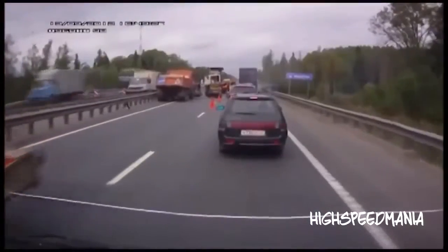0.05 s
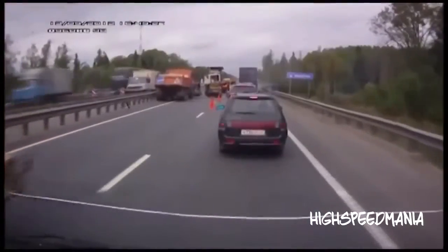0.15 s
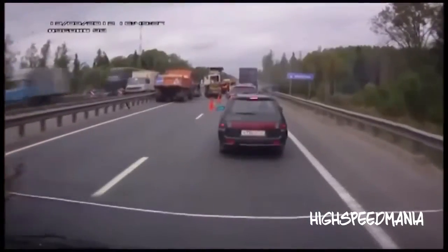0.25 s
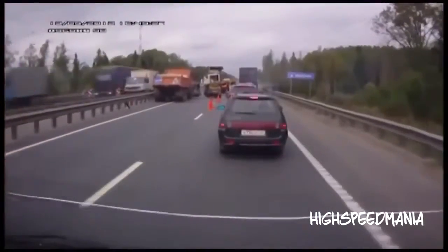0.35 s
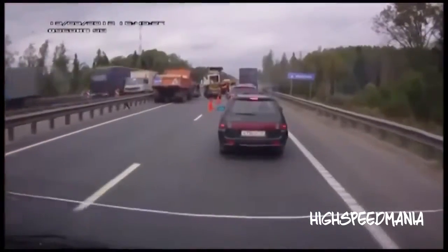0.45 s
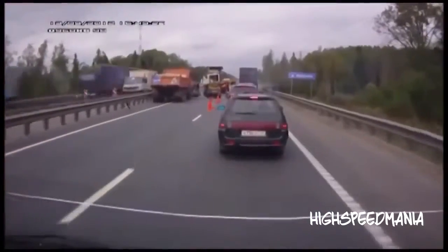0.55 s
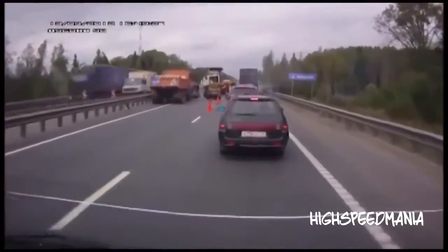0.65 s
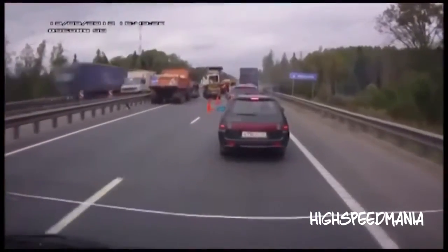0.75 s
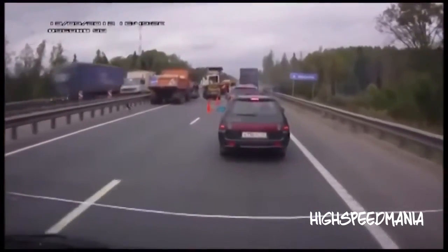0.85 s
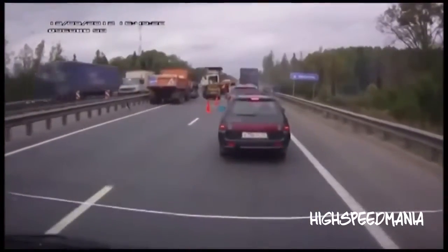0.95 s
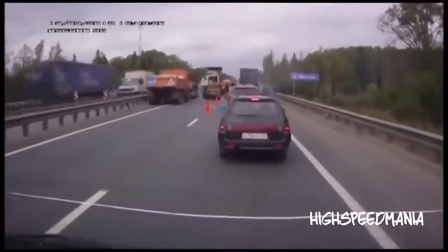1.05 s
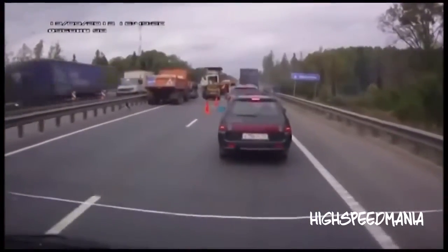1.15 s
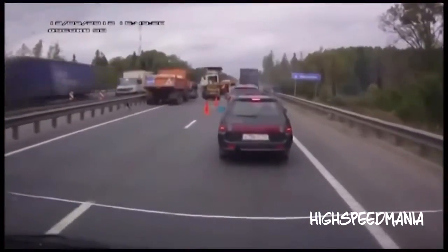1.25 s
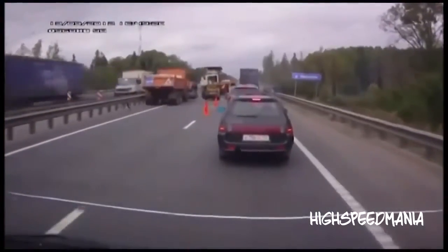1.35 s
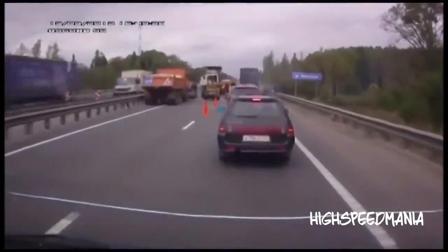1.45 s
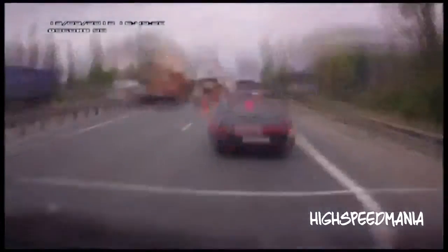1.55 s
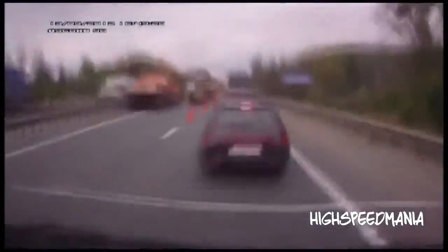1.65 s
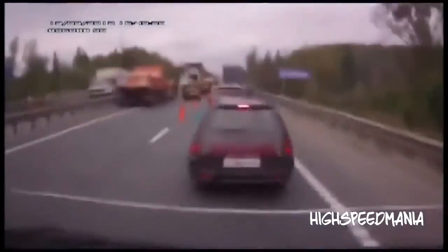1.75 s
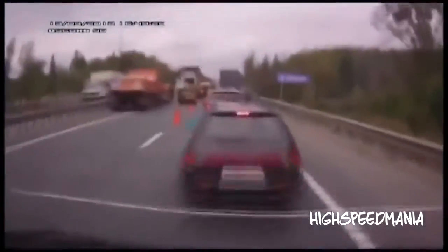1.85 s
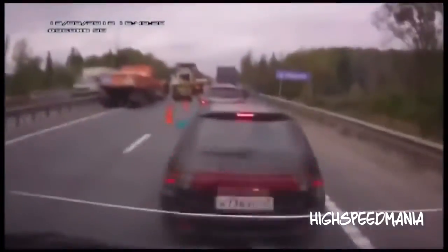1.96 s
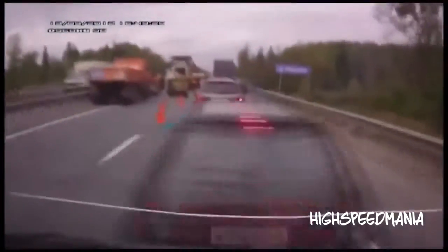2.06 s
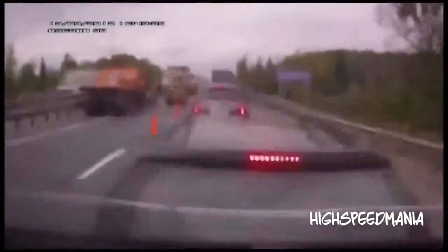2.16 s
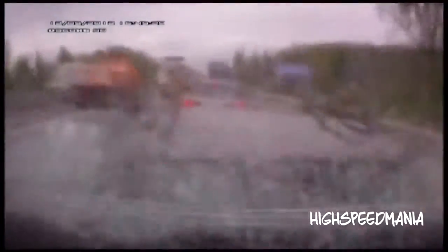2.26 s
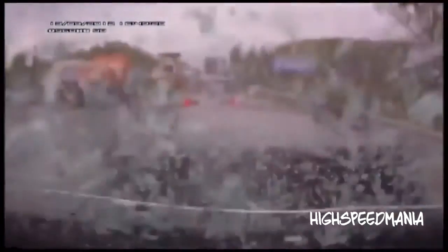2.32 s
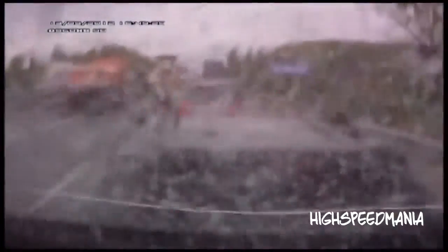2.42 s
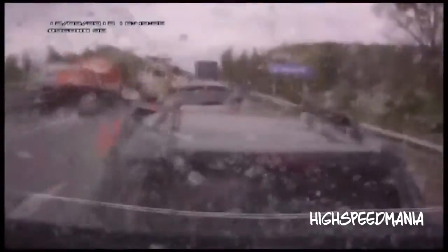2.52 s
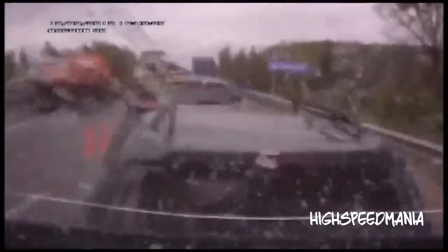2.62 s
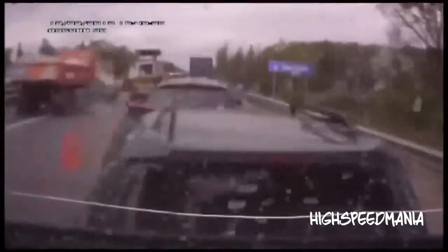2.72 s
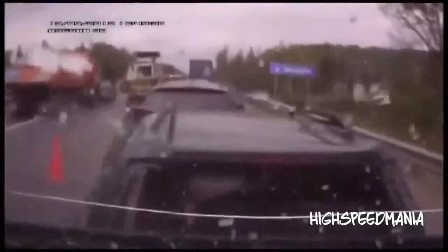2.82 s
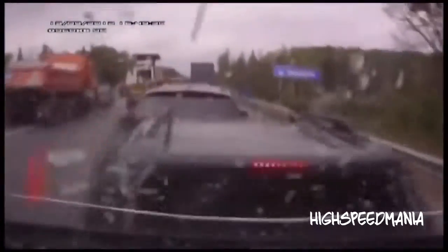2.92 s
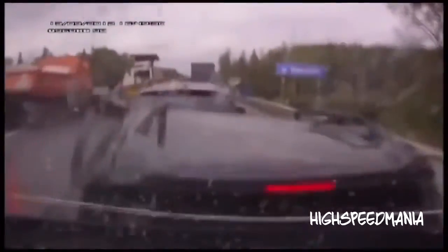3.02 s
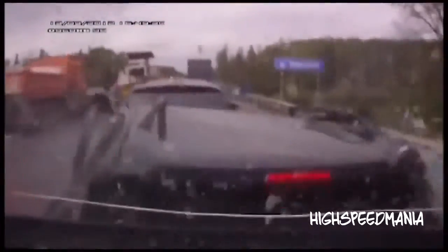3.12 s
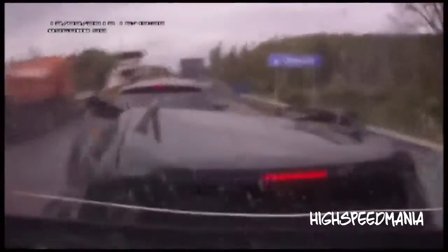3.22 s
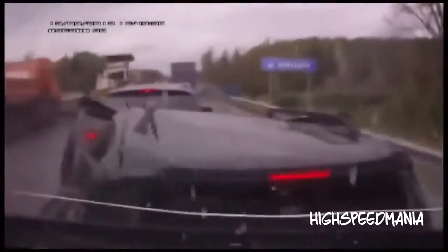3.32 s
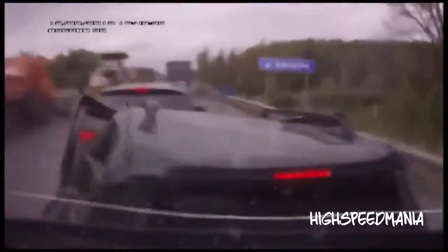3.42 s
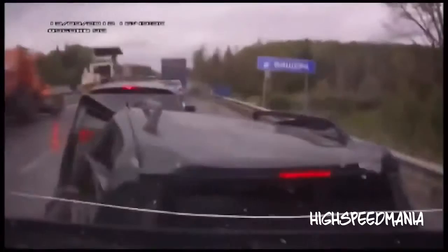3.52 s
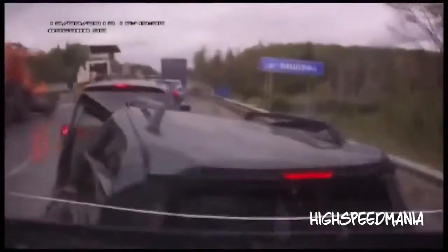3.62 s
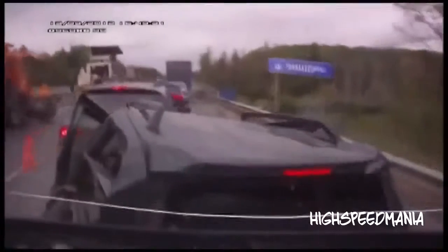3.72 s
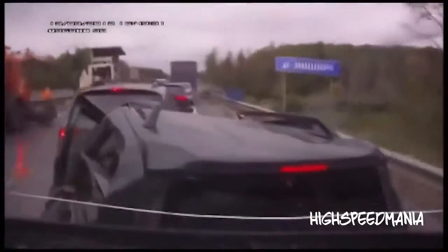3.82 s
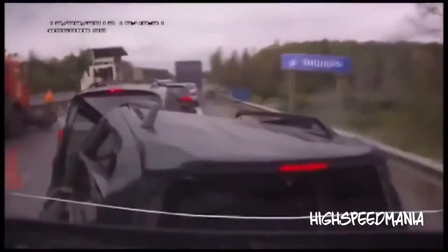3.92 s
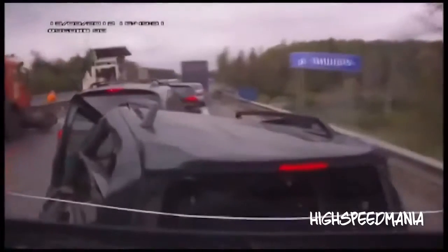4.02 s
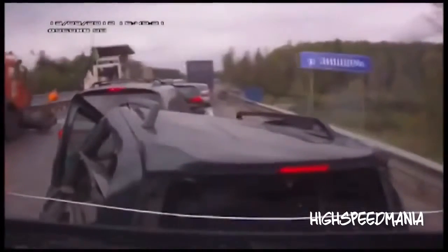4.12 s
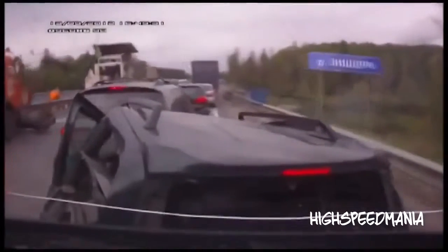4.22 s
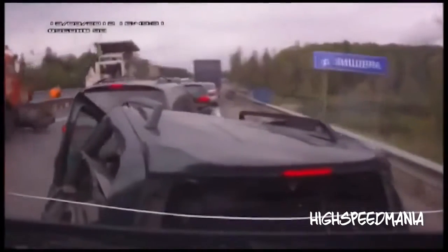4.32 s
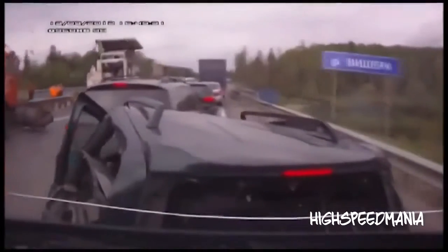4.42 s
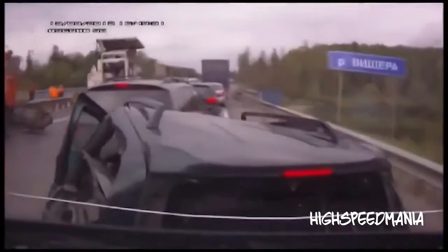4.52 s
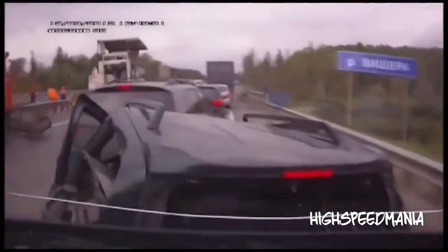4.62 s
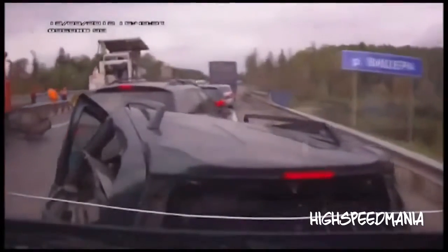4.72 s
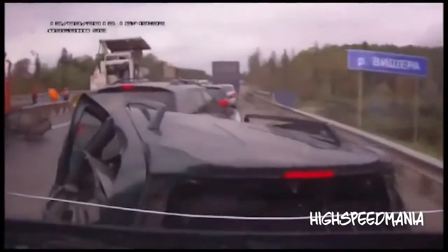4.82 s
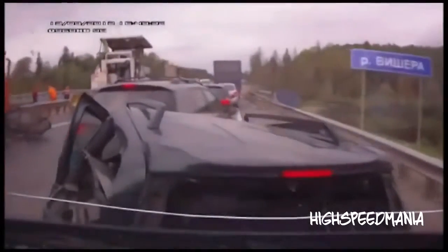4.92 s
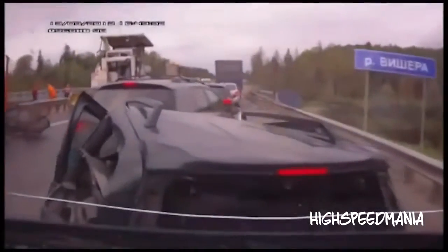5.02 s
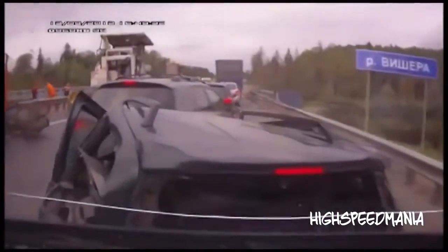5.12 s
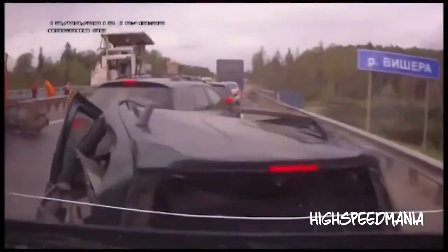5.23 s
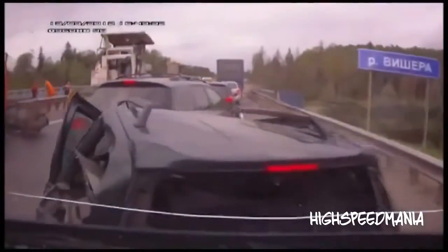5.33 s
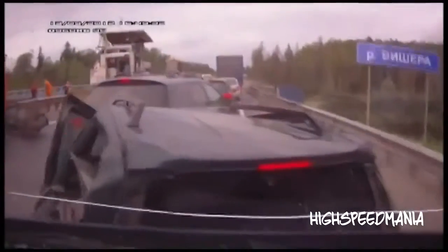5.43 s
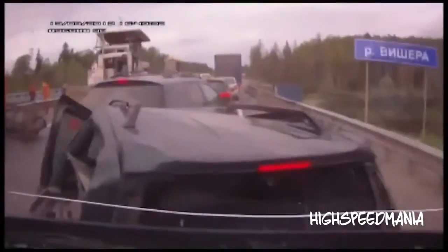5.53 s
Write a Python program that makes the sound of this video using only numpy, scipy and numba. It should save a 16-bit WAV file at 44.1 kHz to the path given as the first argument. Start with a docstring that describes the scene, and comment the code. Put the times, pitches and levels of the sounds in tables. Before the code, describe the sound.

Inside a car on a highway, the engine and tyres hum low. A dull jolt hits from behind, and half a second later the car crashes loudly into the one ahead. Panels boom, sheet metal crumples and scrapes, and glass showers down through repeated blows. The impacts thin into clatter while the labouring engine shakes the body. The small dashboard microphone overloads, so the crash sounds squashed and distorted.

```python
"""A steady hum of engine and tyres fills a car on a highway; then come a jolt from behind and a crash
into the car ahead. Impacts excite the modes of the panels, sheet metal crumples and scrapes by
stick-slip friction, and glass showers down and rings. The labouring engine shakes the body on its
mounts while loose parts clatter. The small dashboard microphone overloads, so its limiter pumps
and the peaks are flattened."""
import sys
import numpy as np
from scipy import signal
from scipy.fft import rfft, irfft, next_fast_len
from scipy.io import wavfile
from scipy.ndimage import uniform_filter1d
from numba import njit

SR = 44100
rng = np.random.default_rng(int(sys.argv[2]) if len(sys.argv) > 2 else 0)


def dump(signal):
    """Clip the signal to [-1, 1] and save it as 16-bit WAV at the path in sys.argv[1]."""
    limited = np.clip(np.atleast_2d(signal).T, -1, 1)
    pcm = np.round(limited * 32767).astype(np.int16)
    wavfile.write(sys.argv[1], SR, pcm)


N = 245725

# bouts of the body shaking on its mounts: (start [s], end [s], first rate [Hz], last rate [Hz], level [dB])
SHUDDER_BOUTS = [(2.039, 2.212, 30, 26, -28.5), (2.298, 2.542, 22, 22.06, -20),
                 (2.574, 2.772, 18.2, 21.1, -22), (2.966, 3.104, 37, 40, -22),
                 (3.095, 3.305, 32.5, 23.5, -18), (3.297, 3.535, 22, 31, -23),
                 (3.637, 3.831, 33, 31, -11.5), (3.854, 4.031, 35.5, 26, -20),
                 (4.09, 4.916, 22.8, 18.2, -12), (4.979, 5.228, 30.5, 30.5, -17),
                 (5.248, 5.549, 23.6, 26, -13.5)]


def amp(db):
    return 10 ** (np.asarray(db) / 20)


def unit_rms(x):
    return x / np.sqrt(np.mean(x ** 2) + 1e-20)


def curves(rows):
    """Linear interpolation turns each column after the time into a curve over all samples."""
    times, *columns = np.transpose(rows)
    return [np.interp(np.arange(N) / SR, times, column) for column in columns]


def span(start, end):
    """A trapezoidal window with 25 ms ramps."""
    t = np.arange(N) / SR
    return np.clip(np.minimum(t - start, end - t) / .025, 0, 1)


def coloured(x, spectrum):
    """Zero-phase filtering by a gain curve of (frequency [Hz], gain [dB]) points."""
    points_hz, db = np.transpose(spectrum)
    size = next_fast_len(N)
    hz = np.fft.rfftfreq(size, 1 / SR)
    gain = amp(np.interp(np.log(hz + 1), np.log(points_hz + 1), db, left=-120, right=-120))
    return irfft(rfft(x, size) * gain, size)[..., :N]


def resonate(x, modes):
    """Modal superposition: two-pole resonators, each of unit power on white noise before its gain."""
    out = np.zeros(x.shape)
    for hz, width_hz, db in modes:
        radius, angle = np.exp(-np.pi * width_hz / SR), 2 * np.pi * hz / SR
        mode = signal.lfilter([np.sin(angle)], [1, -2 * radius * np.cos(angle), radius ** 2], x)
        out += amp(db) * np.sqrt(2 * (1 - radius ** 2)) * mode
    return out


def grains(per_s, spread_db, bed):
    """Shot noise: random clicks of uneven size over a bed of white noise."""
    sizes = amp(spread_db * np.minimum(rng.exponential(1, N), 5)) * rng.standard_normal(N)
    clicks = unit_rms(sizes * (rng.random(N) < per_s / SR))
    return unit_rms(clicks + bed * rng.standard_normal(N))


def flutter(seconds, depth_db):
    """Random amplitude modulation: smoothed noise makes the level flicker."""
    width = int(seconds * SR)
    drift = uniform_filter1d(uniform_filter1d(rng.standard_normal(N), width), width)
    return unit_rms(amp(depth_db * unit_rms(drift)))


def throb(rows, second_db):
    """A gliding fundamental and its second harmonic, from (time [s], rate [Hz], level [dB]) rows."""
    hz, db = curves(rows)
    start, first_hz, _ = rows[0]
    phase = 2 * np.pi * (np.cumsum(hz) / SR - start * first_hz)
    return np.sqrt(2) * amp(db) * (np.sin(phase) + amp(second_db) * np.sin(2 * phase))


def engine():
    """Periodic firing makes a hum, whose pitch drops as the driver lifts off."""
    # the cruising engine: (time [s], firing rate [Hz], level [dB])
    firing = [(0.0, 33.7, -30.5), (0.11, 33.54, -36), (0.56, 34.81, -37), (0.68, 33.56, -30.5),
              (0.81, 33.56, -38.5), (1.19, 36.78, -36), (1.316, 33.54, -33.5), (1.45, 27.8, -35.5),
              (1.75, 29.6, -33.5)]
    fade_out = np.clip((firing[-1][0] - np.arange(N) / SR) / 0.038, 0, 1)
    return throb(firing, second_db=-14.5) * fade_out


def tyres():
    """Broadband excitation by the road makes the tyres roar and the cabin resonate."""
    # tyre roar: (frequency [Hz], relative spectral density [dB])
    roar_spectrum = [(24, -31.5), (40, -25.5), (58, -10.5), (123, -13.5), (187, -9.5), (336, -23.5),
                     (495, -28), (984, -31.5), (1380, -37.5), (1710, -67), (2200, -103), (2860, -116),
                     (4840, -120)]
    # cabin resonances: (frequency [Hz], bandwidth [Hz], gain [dB])
    cabin_modes = [(81.3, 1.1, -48.5), (181.2, 8.4, -50), (470, 4, -65.5), (18.6, 8.5, -41.5)]
    # swell of the road noise: (time [s], gain [dB])
    swell = [(0, -3.5), (.8, 0), (1.6, 1), (1.75, 7.5), (2.2, 1.5), (4.2, 7.5), (5.57, 8)]
    roar = amp(-46.5) * unit_rms(coloured(rng.standard_normal(N), roar_spectrum)) * flutter(0.0092, 1.8)
    booms = resonate(rng.standard_normal(N), cabin_modes)
    return amp(curves(swell)[0]) * (roar + booms)


def wreck():
    """Incoherent sources add in power: the aftermath of each blow swells panels, metal and glass."""
    # slow course of the wreck: (time [s], heave [dB], panel boom [dB], metal [dB], glass [dB])
    course = [(1.69, -35.5, -39, -61, -76), (1.73, -23, -32, -43.5, -58.5), (1.765, -26.5, -36, -65, -67),
              (1.8, -26, -30.5, -40, -58), (1.835, -33.5, -30.5, -52.5, -65), (1.9, -34, -38, -57.5, -72),
              (1.93, -26, -43.5, -52.5, -100), (2.03, -37.5, -58, -59, -100),
              (2.19, -23.5, -44.5, -51, -83.5), (2.2, -23.5, -19, -35, -45), (2.22, -24.5, -34, -39, -44),
              (2.29, -32.5, -26, -34, -44.5), (2.35, -25, -20.5, -20.5, -39.5), (2.4, -18, -22, -27.5, -48),
              (2.5, -33.5, -13, -18.5, -35.5), (2.6, -35, -36, -25, -43.5), (2.7, -5.5, -14.5, -21, -36),
              (2.765, -32, -21.5, -36, -60), (2.8, -40, -23, -25, -39), (2.83, -43, -27, -15, -24),
              (2.865, -44.5, -29.5, -22.5, -32.5), (2.94, -43.5, -26, -15, -28.5),
              (3.0, -24, -26.5, -33, -36.5), (3.35, -18.5, -21.5, -19.5, -31),
              (3.55, -37, -13, -17.5, -33.5), (3.66, -16, -14.5, -16.5, -42), (3.76, -8.5, -22, -16, -38),
              (3.85, -45.5, -11.5, -7, -33), (3.9, -35.5, -20, -25.5, -45), (4.0, -39, -18, -17, -32),
              (4.2, -17.5, -17, -27, -46.5), (4.33, -11.5, -28, -23, -43), (4.38, -12.5, -28.5, -44, -59),
              (4.45, -18.5, -20.5, -28, -43.5), (4.55, -20.5, -29.5, -33, -55),
              (4.7, -28.5, -25.5, -32, -51.5), (4.77, -24.5, -30.5, -29.5, -58.5),
              (4.85, -34, -30.5, -28, -48.5), (4.95, -20.5, -33, -36.5, -52.5), (5.0, -26, -29.5, -34, -55),
              (5.07, -12, -25, -32.5, -47.5), (5.125, -22.5, -30, -34, -57), (5.19, -2, -28.5, -29, -52),
              (5.22, -14.5, -16.5, -29.5, -56), (5.3, -16.5, -24, -28, -51.5),
              (5.45, -13.5, -28.5, -37, -57), (5.51, -14.5, -34, -24.5, -63.5),
              (5.57, -17.5, -33.5, -34.5, -60)]
    # muffling of the bodywork by cabin trim: (frequency [Hz], gain [dB])
    trim = [(10, 9), (1500, -2.5), (2300, -15), (4000, -13.5), (20000, -37)]
    heave_db, boom_db, metal_db, glass_db = curves(course)
    onset = np.clip((np.arange(N) / SR - course[0][0]) / 0.034, 0, 1) ** 2
    (metal_cracks, glass_cracks), (metal_after, glass_after) = blows()
    white = rng.standard_normal(N)  # drives the heave and normalises the metal and glass filters
    heave = amp(heave_db) * body_heave(white)
    boom = np.sqrt(amp(boom_db) ** 2 + 0.64 * metal_after) * panel_boom()
    catch = flutter(0.021, 0.5)  # metal and glass catch and slip together
    metal = crumpling_metal(np.sqrt(amp(metal_db) ** 2 + metal_after), metal_cracks, catch, white)
    glass = glass_shower(np.sqrt(amp(glass_db) ** 2 + glass_after), glass_cracks, catch, white)
    return onset * (heave + coloured(boom + metal, trim) + glass)


def body_heave(white):
    """Random low-frequency vibration of the whole body, which recedes while the shudder takes over."""
    # heaving body: (frequency [Hz], relative spectral density [dB])
    spectrum = [(12, -9.5), (25, -1), (45, -8.5), (80, -28), (120, -7)]
    shuddering = np.minimum(sum(span(start, end) for start, end, *_ in SHUDDER_BOUTS), 1)
    return (1 - 0.71 * shuddering) * unit_rms(coloured(white, spectrum))


def panel_boom():
    """Random forcing drives the low modes of the body panels."""
    # panel resonances: (frequency [Hz], bandwidth [Hz], gain [dB])
    modes = [(112, 35, -4.5), (146, 160, 4), (191.2, 49, 5.5), (285, 82, 3), (366, 140, 3.5)]
    return unit_rms(resonate(grains(per_s=150, spread_db=1.6, bed=1.61), modes))


def crumpling_metal(level, cracks, catch, white):
    """Crumpling drives each sheet-metal mode independently; a crack excites them all at once."""
    # sheet-metal resonances: (frequency [Hz], bandwidth [Hz], gain [dB])
    modes = [(454, 450, 9), (570, 77, 3), (740, 130, 0), (906, 170, 8), (1042, 150, 8), (1184, 160, 7.5),
             (1295, 84, 4.5), (1495, 230, 0.5), (1770, 1800, 2.5)]
    crumple = np.zeros(N)
    for mode in modes:
        force = flutter(0.087, 2.37) * flutter(0.02, 0.96) * grains(per_s=410, spread_db=0.6, bed=4.8)
        crumple += resonate(force, [mode])
    return level * catch * unit_rms(crumple) + resonate(cracks, modes) / np.std(resonate(white, modes))


def glass_shower(level, cracks, catch, white):
    """Many tiny impacts merge into shot noise; faint debris is duller than flying glass."""
    # colour of breaking glass: (frequency [Hz], gain [dB])
    spectrum = [(1100, -71.5), (1800, 1), (2400, -6), (3440, -2), (4900, -10.5), (7000, -3), (9300, -11.5),
                (11000, -20), (12200, -17), (15600, -36)]
    filter_rms = np.std(coloured(white, spectrum))
    pieces = tinkle()
    shower = catch * flutter(0.014, 0.94) * grains(per_s=1500, spread_db=2.3, bed=1.0) + 0.21 * pieces
    glass = coloured(level * shower + cracks, spectrum) / filter_rms
    treble = coloured(glass, [(2500, -97), (3800, -45.0), (5200, 1.0), (20000, 8.5)])
    dullness = 1 - np.minimum((level / amp(-45.5)) ** 0.68, 1)
    late_pieces = 0.28 * span(4.2, 6) * level * pieces
    return glass - dullness * treble + coloured(ticks() + late_pieces, spectrum) / filter_rms


def tinkle():
    """Sparse taps on glass pieces, each convolved with a short, high, damped ring."""
    out, t = np.zeros(N), np.arange(1500) / SR
    taps_per_s = 70  # at each pitch
    for hz, t60 in zip(np.geomspace(2200, 10500, num=18), rng.uniform(.008, 0.07, 18)):
        taps = amp(6.1 * np.minimum(rng.exponential(1, N), 3)) * (rng.random(N) < taps_per_s / SR)
        out += signal.oaconvolve(taps, amp(-60 * t / t60) * np.sin(2 * np.pi * hz * t))[:N]
    return unit_rms(out)


def thuds():
    """Damped oscillation: single panel modes swell and die, wavering in level as the panel bends."""
    # thuds and groans of single panels: (time [s], frequency [Hz], level [dB], t60 [s])
    strikes = [(1.702, 97.6, -8, 0.14), (1.712, 76.4, -8, 0.11), (1.741, 45.3, -12.5, 0.44),
               (1.786, 59.7, -13.5, 0.078), (1.79, 101.7, -13, 0.16), (1.826, 1000, -34, 0.059),
               (1.837, 63.2, -12, 0.17), (1.878, 55, -14.5, 0.29), (1.978, 133.4, -25.5, 0.97),
               (2.191, 58.8, -1, 0.012), (2.197, 156.7, 6.5, 0.16), (2.205, 112.7, 6.5, 0.037),
               (2.226, 175, 7.5, 0.022), (2.245, 85.2, 4, 0.026), (2.272, 55.1, 10, 0.023),
               (2.3, 177, 6.5, 0.043), (2.333, 63.7, -22, 0.032), (2.418, 170, -17, 0.18),
               (2.488, 96.2, 6, 0.055), (2.508, 39.7, 1, 0.091), (2.545, 199.9, -8.5, 0.44),
               (2.528, 291.6, -6, 0.18), (2.551, 388.2, -20, 0.83), (2.605, 379.4, -18, 0.32),
               (2.663, 109.6, -7.5, 0.59), (2.71, 39.6, -15, 0.16), (2.76, 57, -9, 0.037),
               (2.789, 198, 0.5, 0.1), (2.804, 156, -6, 0.093), (2.817, 141.4, -3.5, .1),
               (2.835, 375, 0.5, 0.087), (2.84, 749, -5, .08), (2.857, 173.5, 8.5, 0.019),
               (2.893, 150, 8.5, 0.02), (2.911, 188.6, -8, 0.11), (2.925, 602, -12, 0.074),
               (2.936, 1320, -2.5, .08), (3.015, 697, -18.5, 0.17), (3.35, 338, -11.5, 0.21),
               (3.601, 341.5, -10, 0.17), (3.61, 443, -10.5, 0.33), (3.782, 350, -10.5, .1),
               (3.835, 500.7, -4, 0.14), (3.84, 385, -8, 0.18), (4.141, 327.6, -10.5, 0.14),
               (3.53, 167.4, -13.5, 0.26), (3.585, 160.8, -4.5, 0.4), (3.805, 208, -2, 0.12),
               (3.865, 190, -3.5, 0.4), (3.958, 187.2, -5.5, 0.38), (4.073, 177.6, -3.5, 0.25),
               (4.364, 1094, -24.5, 0.11), (4.407, 1080, -15, 0.12), (4.859, 1070, -18, 0.11),
               (4.902, 175, -10, 0.1), (4.96, 185.5, -14.5, 0.22), (5.238, 297.2, -10, 0.26)]
    out, t = np.zeros(N + SR), np.arange(SR // 2) / SR
    for s, hz, db, t60 in strikes:
        swell = 1 - np.exp(-t / (0.045 * t60))
        envelope = swell * amp(db - 60 * t / t60) * signal.windows.tukey(len(t), .002)
        out[round(s * SR):][:len(t)] -= envelope * np.sin(2 * np.pi * hz * t)
    return out[:N] * flutter(0.0082, 0.82)


def ticks():
    """Brief contacts have broad spectra: bits of glass and trim make very short noise bursts."""
    # dry ticks of single bits: (time [s], level [dB])
    contacts = [(1.705, -40), (1.718, -58), (2.2, -22), (2.2042, -12), (2.238, -29), (2.252, -15),
                (2.283, -24), (2.3215, -30), (2.327, -30), (3.497, -24.5), (3.556, -23.5), (3.785, -12),
                (4.174, -25.5), (4.181, -24), (4.207, -28), (4.253, -43), (4.329, -39), (4.4633, -23.5),
                (4.51, -32), (4.6343, -42.5), (4.8566, -43), (5.0485, -33), (5.062, -31), (5.148, -38),
                (5.292, -39), (5.35, -39.5)]
    rise_s, t60 = 0.00027, 0.0091
    out, t = np.zeros(N + SR), np.arange(800) / SR
    for s, db in contacts:
        envelope = np.minimum(t / rise_s, 1) * amp(db - 60 * t / t60)
        out[round(s * SR):][:len(t)] += envelope * rng.standard_normal(len(t))
    return out[:N]


def blows():
    """Impulsive excitation: returns the cracks and the power of the crumpling and splintering after."""
    # blows of the collision: (time [s], level in metal [dB], level in glass [dB])
    impacts = [(1.706, -28.5, -44.5), (1.737, -39.5, -71.5), (1.794, -33.5, -63), (1.823, -36.5, -73),
               (1.856, -37, -49.5), (2.204, 7.5, -20), (2.226, -7.5, -28.5), (2.239, -7, -30.5),
               (2.249, -12, -22.5), (2.259, 0.5, -14), (2.28, -12.5, -31), (2.301, -5.5, -29),
               (2.318, -6.5, -23), (2.345, -12.5, -32), (2.412, -16, -41), (2.461, -13, -28),
               (2.53, -0.5, -22), (2.541, -2.5, -17), (2.572, -5.5, -28.5), (2.607, -24, -46),
               (2.639, -16, -40), (2.719, -21.5, -24), (2.73, -8.5, -22.5), (2.74, -14, -44),
               (2.768, -20, -51), (2.794, -9, -41), (2.806, -10.5, -30), (2.819, -11, -27),
               (2.834, -0.5, -17), (2.845, 6.5, -25), (2.874, -1, -24), (2.886, -7, -26), (2.893, -8, -26),
               (2.913, -13.5, -21), (2.931, -4.5, -12), (2.943, 2.5, -14), (2.985, -6.5, -33),
               (3.006, -15.5, -47.5), (3.046, -9.5, -23), (3.093, -6.5, -20), (3.112, -9, -23.5),
               (3.184, -11.5, -16.5), (3.249, -28.5, -31.5), (3.268, -19.5, -27), (3.303, -15, -32),
               (3.345, -22.5, -19), (3.437, -16, -51), (3.525, -23.5, -26), (3.557, -9, -29),
               (3.595, -25.5, -33), (3.611, -14, -27), (3.632, -4.5, -40), (3.647, -18.5, -36),
               (3.665, -18, -27.5), (3.724, -15, -32.5), (3.745, -12, -50.5), (3.783, -42.5, -25.5),
               (3.806, -16, -49), (3.821, -1, -39.5), (3.877, -6.5, -26.5), (3.926, -5.5, -39),
               (3.938, -28, -20.5), (3.971, -6.5, -31), (4.052, -18, -34.5), (4.166, -12.5, -36.5),
               (4.205, -15.5, -26.5), (4.271, -29, -32), (4.298, -8.5, -24.5), (4.364, -9.5, -58),
               (4.39, -26, -57), (4.408, -12.5, -41), (4.46, -18.5, -40), (4.509, -24, -40.5),
               (4.556, -12, -53), (4.631, -33, -44.5), (4.732, -30, -65), (4.856, -13, -35),
               (4.908, -18.5, -40), (5.025, -26, -41), (5.048, -19.5, -44.5), (5.062, -21.5, -40),
               (5.149, -35, -47.5), (5.244, -7, -41), (5.288, -30.5, -51.5), (5.347, -37, -34.5)]
    # each pair is metal, glass
    crack_rise_s, crack_t60 = np.c_[[0.00092, 0.0013]], np.c_[[0.043, 0.044]]
    after_db, after_t60, after_rise_s = np.c_[[-11.5, -9]], np.c_[[0.09, 0.15]], 0.0066
    t = np.arange(SR // 4) / SR
    crack = (1 - np.exp(-t / crack_rise_s)) * amp(-60 * t / crack_t60)
    tail = (1 - np.exp(-t / after_rise_s)) * amp(after_db - 60 * t / after_t60)
    cracks, after_power = np.zeros((2, 2, N + SR))
    for s, metal_db, glass_db in impacts:
        level, at = amp([[metal_db], [glass_db]]), round(s * SR)
        cracks[:, at:at + len(t)] += level * crack * rng.standard_normal(crack.shape)
        after_power[:, at:at + len(t)] += (level * tail) ** 2
    return cracks[:, :N], after_power[:, :N]


def shudder():
    """Forced vibration: the body rocks on its mounts at the rate of the labouring engine."""
    return sum(span(start, end) * throb([(start, first_hz, db), (end, last_hz, db)], second_db=-25.0)
               for start, end, first_hz, last_hz, db in SHUDDER_BOUTS)


def shards():
    """Free vibration: each large piece of glass rings briefly on two close modes that beat."""
    # large glass pieces: (time [s], lower frequency [Hz], level [dB])
    pieces = [(2.543, 3470, -26), (2.652, 6570, -35), (2.73, 3250, -32), (2.732, 7200, -26),
              (2.985, 6760, -32.5), (3.182, 6150, -29), (3.938, 6720, -27.5), (4.464, 3900, -40.5),
              (5.352, 7840, -47.5)]
    rise_s, t60 = 0.0018, 0.067
    out, t = np.zeros(N + SR), np.arange(SR // 5) / SR
    for s, hz, db in pieces:
        pair = np.sin(2 * np.pi * hz * t) + 1.6 * np.sin(2 * np.pi * 1.04 * hz * t)
        out[round(s * SR):][:len(t)] += amp(db - 60 * t / t60) * np.minimum(t / rise_s, 1) * pair
    return out[:N]


def scrape():
    """Stick-slip friction rings two resonances of torn sheet metal, which glide as it bends."""
    # scraping metal: (time [s], lower resonance [Hz], level [dB])
    glide = [(2.98, 1250, -44), (3.01, 1213, -26.5), (3.06, 1214, -36.5), (3.096, 1229, -26.5),
             (3.13, 1178, -30.5), (3.17, 1046, -28.5), (3.212, 1105, -23.5), (3.242, 1050, -37.5),
             (3.274, 1013, -18.5), (3.3, 1018, -31.5), (3.34, 1001, -23.5), (3.39, 987, -24.5),
             (3.44, 1044, -27), (3.53, 1038, -25), (3.61, 997, -25), (3.7, 999, -24.5), (3.76, 862, -32.5),
             (3.86, 1093, -21.5), (3.9, 1034, -36.5), (3.99, 1134, -26), (4.05, 1020, -29.5),
             (4.17, 1016, -30), (4.24, 925, -45), (4.3, 1104, -36.5), (4.42, 1142, -42), (4.5, 1110, -55)]
    hz, db = curves(glide)
    slips = grains(per_s=900, spread_db=1.6, bed=1.5)
    out, width_hz = np.zeros(N), 85
    radius = np.exp(-np.pi * width_hz / SR)
    for ratio, ring_db in [(1, 0), (1.19, -2)]:
        carrier = np.exp(2j * np.pi * np.cumsum(ratio * hz) / SR)
        # shift down, low-pass, shift back: a band-pass that follows the glide
        ring = carrier * signal.lfilter([1 - radius], [1, -radius], slips / carrier)
        out += amp(ring_db) * unit_rms(ring.real)
    return span(glide[0][0], glide[-1][0]) * amp(db) * out


def scene():
    """Superposition of all sources, alike in both channels."""
    cabin = engine() + tyres() + thuds() + wreck() + shudder() + shards() + scrape()
    return np.array([cabin, cabin])


@njit
def limiter_gain(x, ceiling, fall_db_per_s, rise_db_per_s, lag_s):
    """Lagging feedback: overshoot builds a cut, so the gain dives after each peak, then climbs back."""
    gain, cut_db, late_db = np.empty(len(x)), 0., 0.
    for i in range(len(x)):
        gain[i] = 10 ** (-late_db / 20)
        overshoot = abs(x[i]) * gain[i] / ceiling - 1
        if overshoot > 0:
            cut_db = min(cut_db + fall_db_per_s / SR * min(overshoot + .3, 1.), 38.)
        else:
            cut_db = max(0., cut_db - rise_db_per_s / SR)
        late_db += (cut_db - late_db) / (lag_s * SR)
    return gain


def record(dry):
    """Nonlinear overload: limiting and soft clipping, then roll-off, faint random differences between the
    channels, a band limit."""
    # microphone response: (frequency [Hz], gain [dB])
    response = [(5, 2.5), (10500, -5.5), (12000, -17.5), (15000, -20), (22000, -38)]
    # faint random differences between the channels in the treble: (frequency [Hz], gain [dB])
    width = [(20, -63.5), (1000, -64.5), (2000, -46), (3500, -18.5), (12000, -22.5)]
    ceiling, knee, edge_hz = amp(-19.2), 9, 15400
    gain = limiter_gain(dry[0], ceiling, fall_db_per_s=7000, rise_db_per_s=1300, lag_s=.008)
    treble = coloured(dry[0], [(800, -73), (1500, -11.0), (2300, -5.0), (22000, -1.0)])
    drive = (dry[0] - treble) * gain / ceiling
    clipped = drive / (1 + abs(drive) ** knee) ** (1 / knee)
    # the treble pumps less sharply and survives the flat tops
    treble_gain = uniform_filter1d(gain, size=1100) ** 0.91 * (1 - 0.33 * clipped ** 4)
    mid = coloured(ceiling * clipped + treble * treble_gain, response)
    frames = signal.stft(coloured(mid, width), nperseg=512)[2]
    random_phase = np.exp(2j * np.pi * rng.random(frames.shape))
    side = signal.istft(frames * random_phase, nperseg=512)[1][:N]
    low_pass = signal.firwin(255, edge_hz, window=("kaiser", 9), fs=SR)
    return signal.oaconvolve(np.array([mid + side, mid - side]), low_pass[None], "same")


dry = scene()
out = record(dry)
dump(out)
```